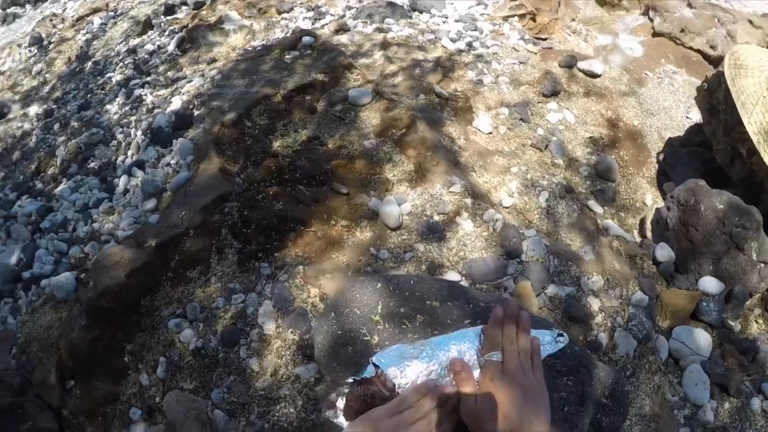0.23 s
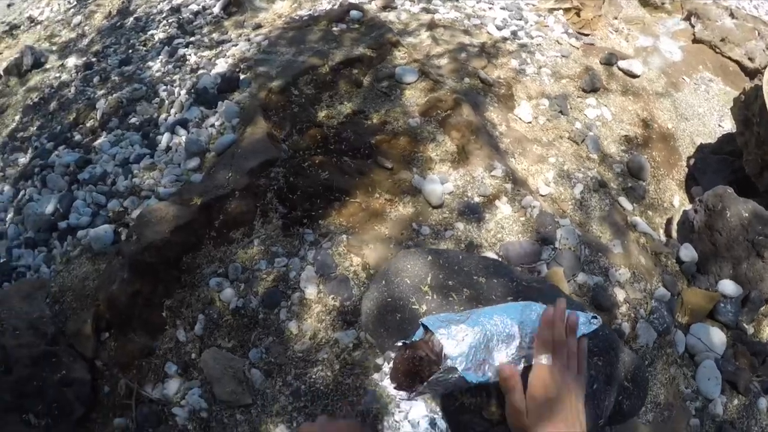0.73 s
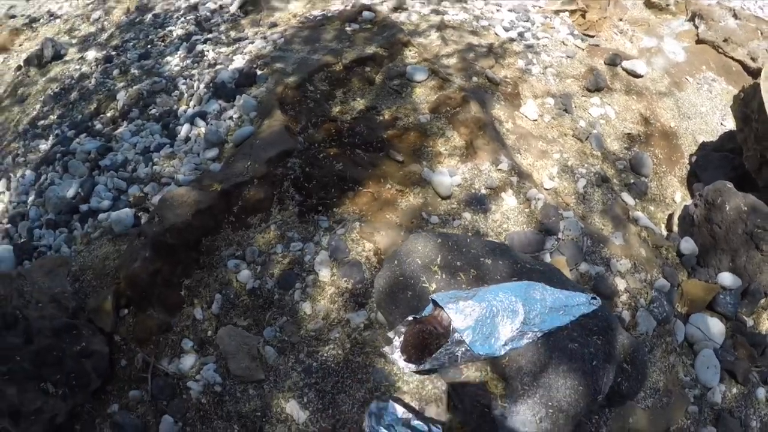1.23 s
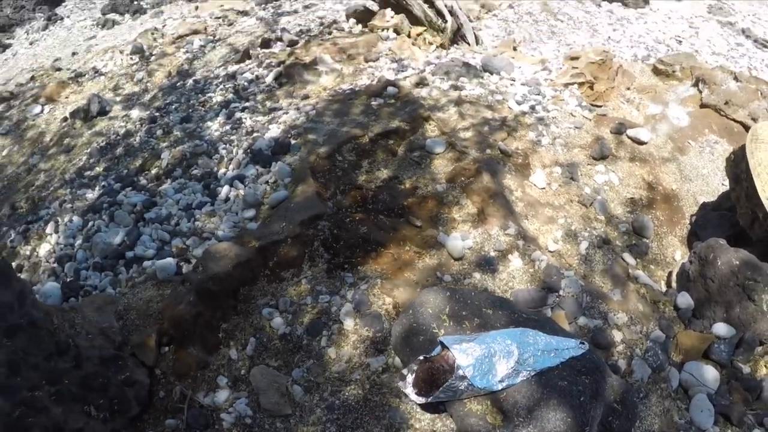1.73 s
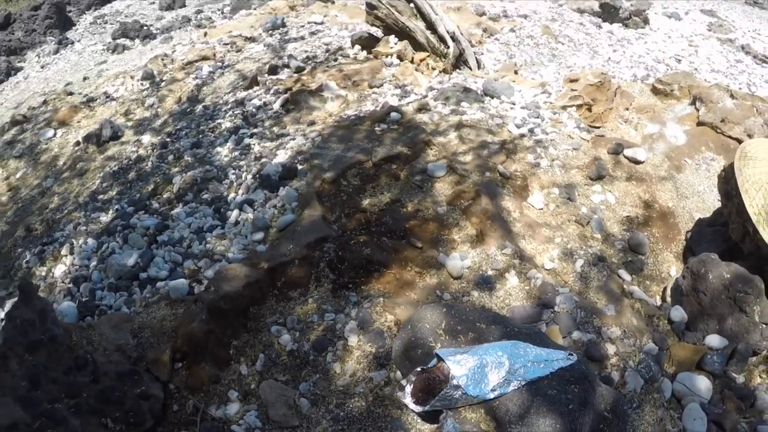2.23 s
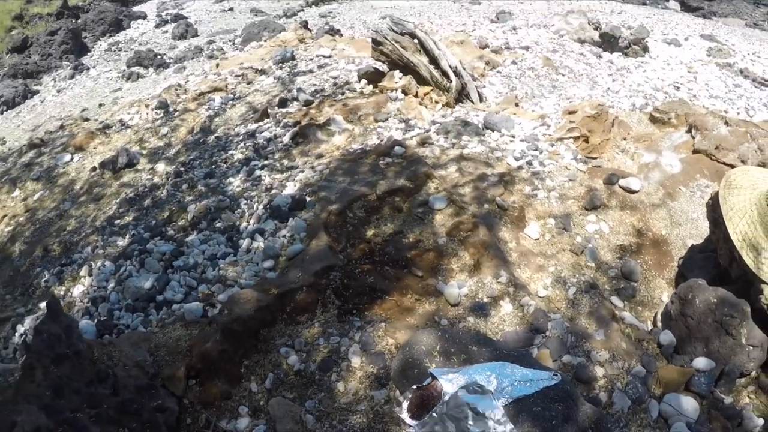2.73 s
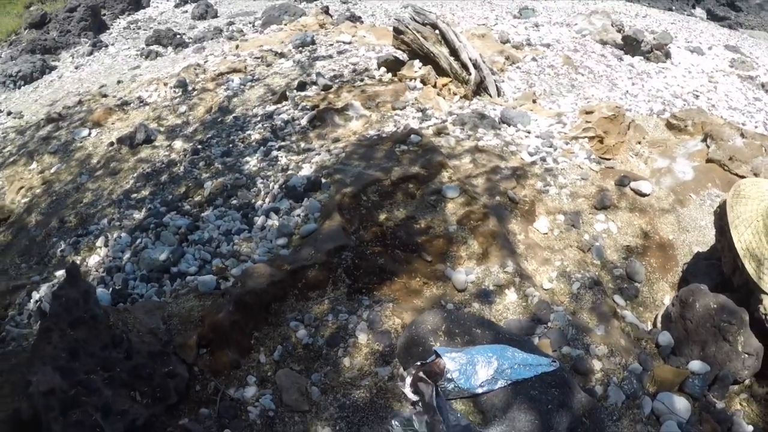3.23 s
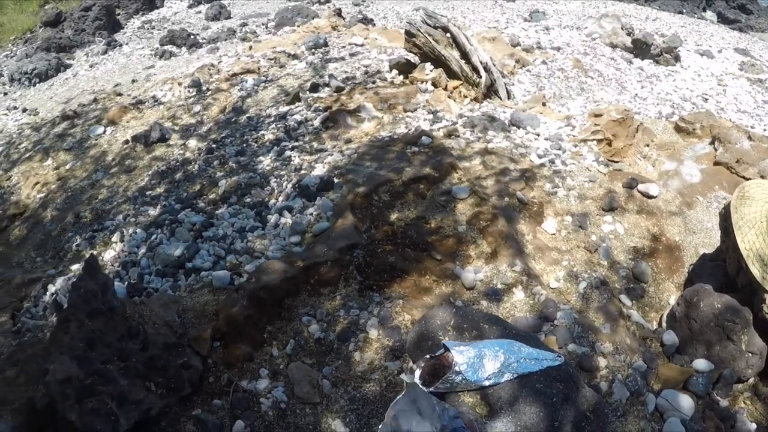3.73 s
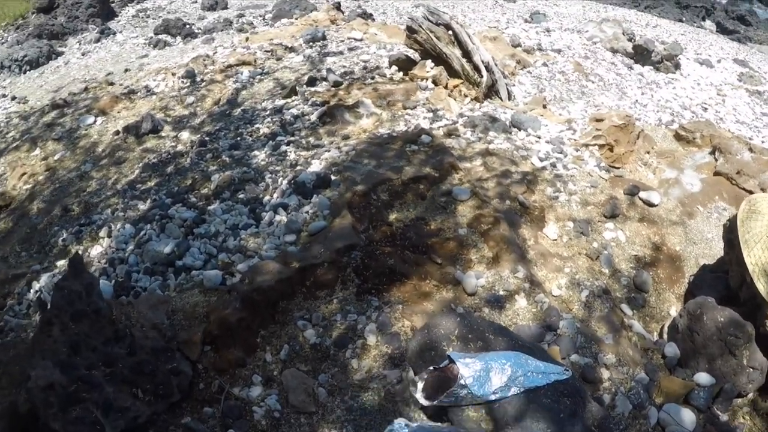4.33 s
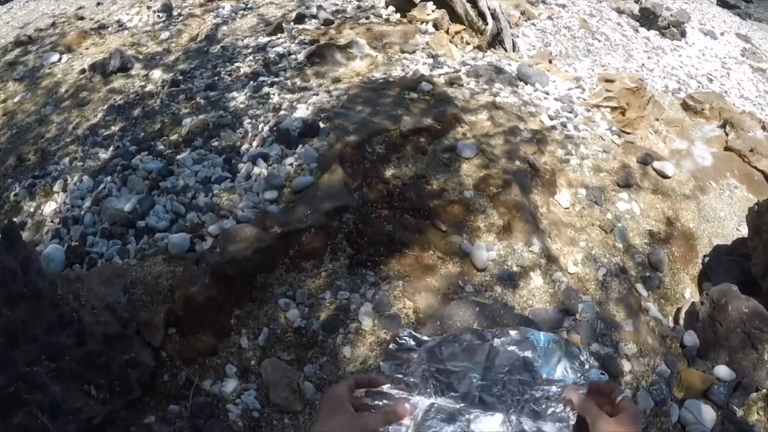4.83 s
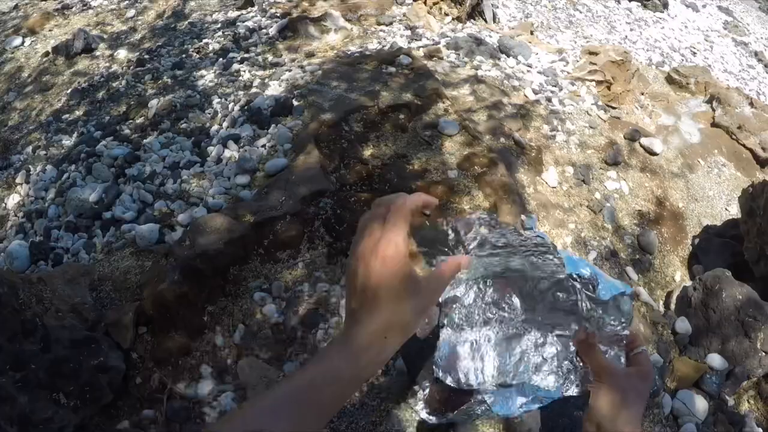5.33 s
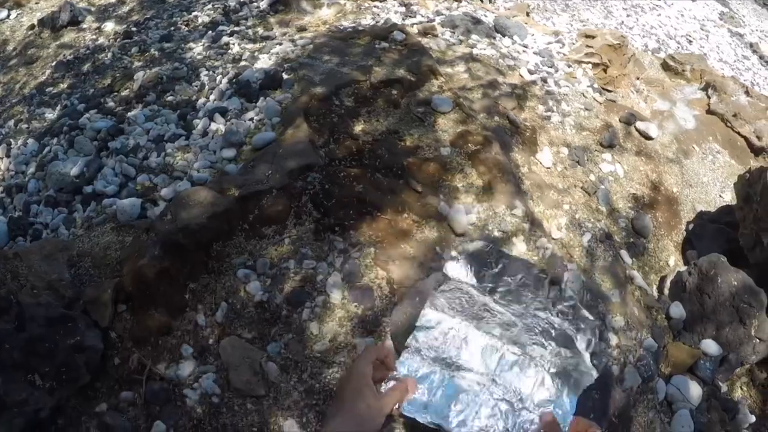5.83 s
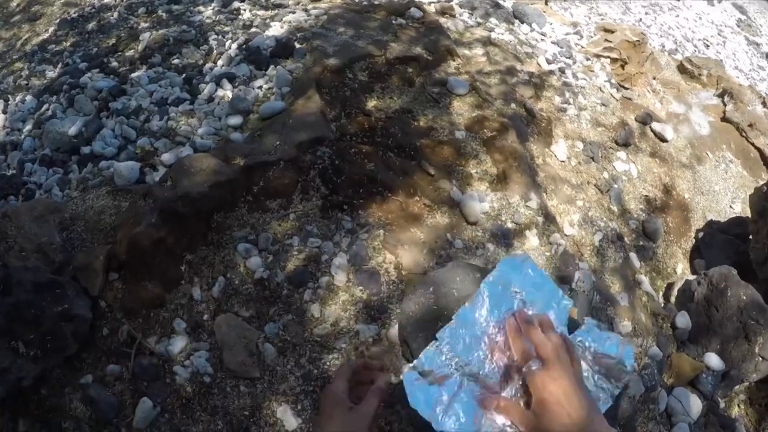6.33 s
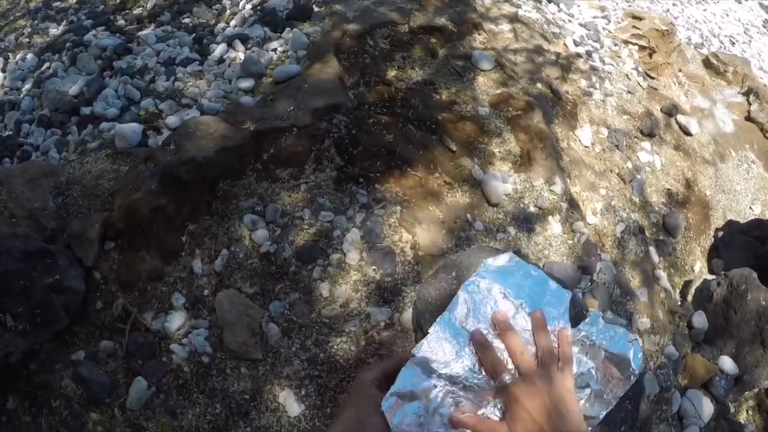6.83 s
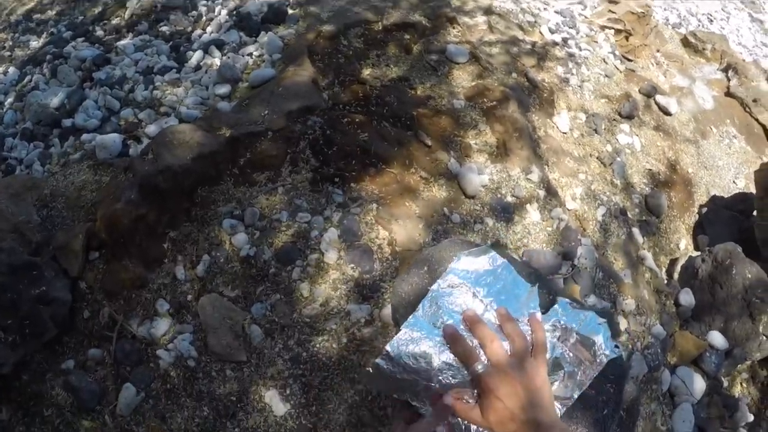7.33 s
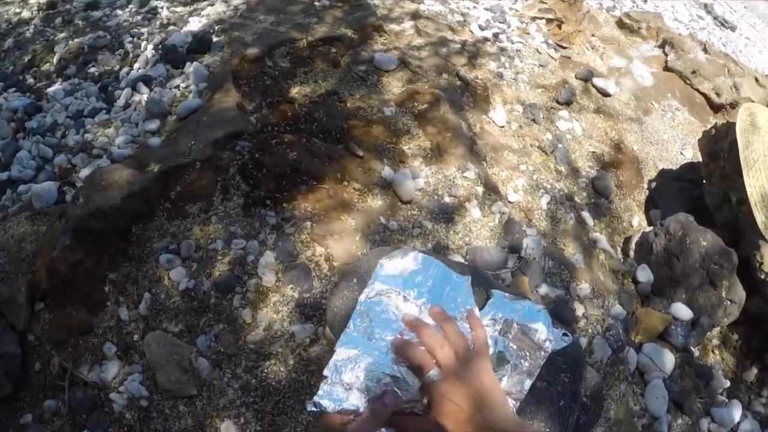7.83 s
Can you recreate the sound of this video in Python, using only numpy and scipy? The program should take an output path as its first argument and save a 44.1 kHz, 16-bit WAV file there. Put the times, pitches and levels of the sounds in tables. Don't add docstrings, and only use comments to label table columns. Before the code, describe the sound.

Metal foil crinkles, snaps and rustles close by as hands fold and press it outdoors, over steady distant surf hiss and light wind buffeting.

```python
import sys
import numpy as np
from scipy import signal
from scipy.fft import rfft, irfft, next_fast_len
from scipy.io import wavfile

SR = 44100
rng = np.random.default_rng(int(sys.argv[2]) if len(sys.argv) > 2 else 0)


def materialize(psi):
    bounded = np.clip(np.atleast_2d(psi).T, -1, 1)
    quanta = np.round(bounded * 32767).astype(np.int16)
    wavfile.write(sys.argv[1], SR, quanta)


def volts_from_db(level):
    exponent = np.asarray(level, float) / 20
    return 10 ** exponent


N = 356019

# (pitch [Hz], level per Hz [dB])
SURF_SPECTRUM = [(200, 15), (500, 9), (1500, 2.5), (3000, 3), (6000, -11.5), (12000, -3.5)]
# (pitch [Hz], level per Hz [dB])
BUFFET_SPECTRUM = [(90, 0.5), (120, 3), (165, 0), (220, -5.5), (300, -9), (450, -24), (900, -22)]
# (time of the height [s], buffeting level [dB], length [s], left over right [dB])
GUSTS = [(0.005, -44.5, 0.041, 6), (1.677, -53.5, 0.46, 22), (2.517, -69, 0.27, -2),
         (4.178, -45.5, 0.14, 9.5), (4.62, -45.5, 0.21, 6.5), (4.995, -54, 0.75, 0),
         (5.99, -48.5, 0.22, 12), (6.357, -46.5, 0.21, 4), (6.554, -55, 0.19, -9), (6.78, -45, 0.096, 2),
         (6.947, -41.5, 0.17, 5), (7.307, -43.5, 0.15, 8), (7.48, -44, 0.071, 21),
         (7.514, -41.5, 0.077, 17), (7.583, -36, 0.11, 16), (7.668, -36.5, 0.1, -6), (8.0, -49, 0.95, 2)]
# (time [s], level [dB], left over right [dB])
EDDIES = [(1.223, -40, 16), (1.265, -36, 13), (1.395, -51, 5), (1.51, -33.5, 19), (1.593, -35.5, 16),
          (1.675, -34, 16), (1.726, -35, 18), (1.752, -40, 16), (1.821, -42, 16), (1.922, -41, 13),
          (2.229, -38, 14), (2.545, -31.5, 4), (3.115, -40, 16), (4.161, -34, 19), (4.341, -39.5, 5),
          (4.59, -34, -3), (4.64, -34, -8), (5.018, -42, 8), (5.218, -34, 7), (5.279, -38, 14),
          (5.67, -32, -3), (5.778, -39.5, 9), (5.861, -39, 17), (5.899, -37.5, 17), (5.983, -33, 18),
          (6.068, -37, 22), (6.143, -42.5, 30), (6.196, -37, 9), (6.25, -42, 5), (6.363, -34, 22.5),
          (6.466, -38, 3), (6.541, -32, 1), (6.782, -36.5, 22), (6.874, -38, 16), (6.902, -32, 14),
          (6.988, -36, 18), (7.084, -39.5, 15), (7.152, -36.5, 12), (7.192, -38, 5), (7.226, -36, 25),
          (7.289, -27.5, 11), (7.365, -33, 3), (7.395, -37, 24), (7.545, -21, 21), (7.588, -20, 15),
          (7.786, -47, 4), (7.84, -30.5, 0), (7.929, -44, 8), (7.958, -37, 9), (7.989, -37, 12)]
# (pitch [Hz], response [dB], left over right [dB], right leads [rad], likeness [0-1])
PORTS = [(294, -7, 2.5, 2, 0.34), (610, -2, 6.5, 2, 0.8), (860, 1, 1, 2.5, 0.71),
         (1150, 1.5, -6.5, 2, 0.91), (1444, -0.5, -6, 2, 0), (1593, 0, -9.5, 2.2, 1),
         (1950, 0.5, 1.5, -1.7, 0.78), (2220, -5, -2, -0.7, 0.24), (2900, -4.5, -5.5, 1.14, 0.8),
         (4260, -4.5, 0.5, -1.8, 0.9), (5060, -4.5, .5, 1.13, 0.7), (6040, 4, 1.5, 1.1, 0.84),
         (6900, 3, .5, 1.1, .6), (7700, -0.5, -1, 1.1, 0.4), (8700, -5.5, -5, -1, .1),
         (10240, -12.5, -4, -2.9, .3), (11300, -20, -1.5, -3.1, 0.2), (12200, -15.5, 0, -3.1, .36),
         (14400, -17.5, 0, -3.1, .38), (15500, -32, 1, -3.1, 0.2)]
# (time [s], left peak level [dB], right peak level [dB])
KNOCK = (7.6682, -7, -13.5)
# (pitch [Hz], level [dB], t60 [s], right side louder by [dB])
HOUSING_MODES = [(198, 2, 0.021, 2), (494, 2.5, 0.0096, -5), (1000, 3, .006, -4), (1700, 4.5, 0.0052, -4),
                 (2140, 5, 0.0042, -3), (3140, -1, 0.007, 2), (3800, 1, 0.0064, -3.5),
                 (4450, -4, 0.0041, 8), (5300, -12.5, 0.0084, 13.5), (5900, -17, .006, 7),
                 (7000, -17, .005, 4), (8700, -9.5, 0.0064, 7)]
# (time [s], peak level [dB], panel pitch [Hz])
POPS = [(.1, -35, 1230), (0.388, -30, 930), (.626, -30, 837), (1.454, -27.5, 1700), (2.2, -30, 622),
        (2.201, -28, 2510), (2.283, -26.5, 740), (2.768, -27, 3300), (2.872, -36, 1900), (3.518, -33, 1180),
        (4.751, -26, 1240), (5.287, -26, 3700), (5.645, -32, 1910), (5.662, -22, 745), (5.817, -29, 4000),
        (5.942, -29, 2050), (5.945, -24, 1130), (5.954, -23, 1860), (6.854, -26, 900), (6.89, -17, 417),
        (7.1, -29.5, 477), (7.157, -23, 470), (7.187, -21, 1000), (7.281, -21, 745), (7.344, -21.5, 760),
        (7.568, -15.5, 374), (7.617, -24, 2700), (7.84, -30, 1860), (7.909, -29, 1120)]
# (time [s], peak level [dB], bright over dull [dB], thud level [dB])
TICKS = [(0.1036, -32, -8, -5), (0.4146, -34, -10, -8), (0.4264, -23, -2, -16), (0.431, -38, -4, -10),
         (0.6673, -33, 9, -18), (1.8404, -35, -6, -19), (1.8554, -33, 3, -15), (1.9322, -21, -1, -12),
         (2.3839, -21, 3, -9), (2.428, -27, -7, -14), (2.7608, -23, 3, -9), (2.8914, -32, -7, -10),
         (3.0398, -35, -3, -9), (3.5458, -34, -14, -8), (3.66, -22, 8, -3), (4.0179, -39, 13, -18),
         (4.0675, -38, -9, -16), (4.0725, -30, -16, -14), (4.1494, -24, 11, -14), (4.1678, -16, -6, -12),
         (4.2123, -32, 5, -11), (4.2795, -38, -10, -6), (4.3563, -35, -11, 6), (5.0255, -22, -1, -10),
         (5.1888, -23, 0, -4), (5.2159, -25, -6, -7), (5.2538, -28, -3, -6), (5.2884, -26, -15, -17),
         (5.3597, -32, -9, -11), (5.6066, -40, -23, -9), (5.665, -19, -8, -11), (5.6716, -24, -6, -10),
         (5.757, -29, -10, -14), (5.7913, -24, -4, -14), (5.8055, -29, -6, 1), (5.829, -28, -12, 19),
         (6.2466, -33, 1, -13), (6.3705, -23, -27, -17), (6.7891, -19, -10, -16), (6.8727, -30, -6, -2),
         (6.905, -18, -6, 3), (6.9322, -24, -18, -9), (6.9398, -31, -17, -9), (7.0585, -31, 10, -13),
         (7.1041, -30, -12, -11), (7.2587, -30, -1, -15), (7.4398, -33, 1, -15), (7.618, -18, -16, -14),
         (7.788, -9.5, 25, -4), (7.911, -19, -2, -6)]
# (time 1.1 ms ahead of the flip [s], peak level [dB], bright over dull [dB], thud level
# [dB])
LEADS = [(2.198, -20, 0, -22), (2.757, -24, -4, -10), (2.8729, -18, -13, 4), (3.517, -22, -4, -12),
         (4.0992, -23, -7, -12), (4.156, -25, -2, -12), (4.5408, -18, -10, -17), (5.056, -29, -15, -12),
         (5.1133, -21, 2, -14), (5.1973, -21, -2, -14), (5.3748, -21, 4, -18), (5.636, -22, -2, -12),
         (6.2307, -28, 6, -8), (6.688, -32, -4, -14), (6.7054, -29, -4, -12), (6.7715, -24, -4, -12),
         (6.8279, -29, -4, -12), (6.8554, -29, -4, -10), (6.9677, -28, -4, -12), (7.1282, -33, -7, -12),
         (7.1443, -22, -6, -12), (7.1587, -14.5, -9, -6), (7.904, -30, -4, -12)]
# (time [s], peak level [dB], fold depth [dB], dying time [s])
SNAPPING = [(0.1263, -25, -10, 0.054), (0.397, -23.5, -14, 0.022), (0.626, -16, -12, 0.046),
            (1.1036, -32, -34, 0.14), (1.338, -23.5, -13, 0.035), (1.3796, -24, -38, 0.033),
            (1.839, -23, -36, 0.031), (1.853, -26, -30, 0.036), (1.93, -30, -30, 0.039),
            (2, -25, -13, 0.056), (2.114, -25.5, -12, 0.059), (2.1991, -11.5, -9.5, 0.021),
            (2.3456, -30.5, -11, 0.12), (2.406, -30, -28, 0.028), (2.461, -24.5, -35, 0.04),
            (2.529, -21, -12.5, 0.055), (2.754, -23, -28, 0.085), (2.8404, -38, -0.5, 0.049),
            (2.874, -13, -4.5, 0.015), (3.1197, -21, -33, 0.024), (3.2594, -23, -29, 0.026),
            (3.47, -25, -29, .037), (3.5184, -20.5, -19, 0.037), (3.768, -25.5, -27, 0.018),
            (4.0164, -13.5, -33, 0.024), (4.0662, -26, -21, 0.033), (4.1, -21.5, -19, 0.029),
            (4.152, -25, -15, 0.11), (4.2108, -36.5, -6, 0.21), (4.5406, -23, -3.5, 0.036),
            (4.966, -26, -13, 0.036), (5.025, -16.5, -12, 0.013), (5.055, -20.5, -17, 0.054),
            (5.196, -23, -13, 0.066), (5.305, -24, -15, 0.048), (5.357, -32, -10, 0.031),
            (5.376, -13.5, -36, 0.015), (5.637, -22.5, -12, 0.034), (5.665, -15.5, -8.5, 0.04),
            (5.757, -30, -11, 0.046), (5.791, -23, -35, 0.025), (5.844, -30.5, -8.5, 0.12),
            (5.9484, -32, -13, 0.054), (6.231, -24, -12.5, 0.077), (6.3683, -31, -13.5, 0.15),
            (6.703, -29, -29, 0.07), (6.771, -27, -12, 0.075), (6.7872, -26, -16, 0.019),
            (6.854, -26.5, -6, 0.061), (6.905, -29, -14, .011), (6.967, -27, -15, 0.039),
            (7.058, -20, -30, 0.019), (7.101, -19.5, -7.5, 0.02), (7.1433, -21, -18, 0.058),
            (7.1592, -14, -18, 0.016), (7.1873, -20.5, -8, 0.032), (7.2575, -27, -30, 0.044),
            (7.284, -31, -2, 0.039), (7.44, -21, -14, 0.016), (7.543, -22, -12, 0.035)]
# (time [s], peak level [dB], fold depth [dB])
CRUSHING = [
    (7.5776, -19.5, -14),
    (7.615, -27.5, 3),
    (7.684, -19, -8),
    (7.768, -17, 0),
    (7.7874, -15, -14),
    (7.839, -22, -8),
    (7.883, -24.5, -13),
    (7.904, -20, -16),
    (7.93, -23, -7),
    (7.961, -27, -12),
]
# (time [s], peak level [dB], fold depth [dB])
FAINT = [(0.562, -28.5, -32), (0.7695, -33, -11), (1.1663, -33, -25), (1.3054, -29, -28),
         (2.1645, -34, -12), (2.4269, -33, -24), (2.95, -27, -11), (3.039, -32, -12), (3.223, -32.5, -10),
         (3.868, -30, -20), (4.353, -37.5, -3), (4.462, -27.5, -11), (4.683, -23.5, -20), (5.273, -25, -10),
         (5.8284, -45, -13), (5.932, -35, -2), (6.152, -30.5, -2), (6.651, -30, -4.5), (6.687, -25.5, -21),
         (6.8281, -30, -9), (7.3385, -41.5, 5), (7.445, -24, -25), (.6659, -31, -26), (8.041, -30, -4)]
# (time of most effort [s], bright rustle level [dB], length [s], sheet body level [dB])
MOVES = [(0.11, -44, 0.038, -50), (0.3, -49, 0.22, -47), (0.627, -65, .1, -58), (1.028, -46, 0.26, -38.5),
         (1.265, -43.5, 0.29, -60), (1.682, -48, 0.4, -41.5), (1.973, -39, 0.079, -62),
         (2.183, -45, 0.073, -57), (2.367, -54, 0.4, -45.5), (2.76, -43.5, 0.088, -37.5),
         (2.88, -44, 0.12, -58), (3.068, -49.5, 0.053, -41), (3.528, -45.5, 0.24, -40),
         (3.916, -62, 0.38, -40), (4.152, -41.5, 0.061, -36), (4.47, -49.5, 0.88, -39),
         (4.705, -45.5, 0.12, -37.5), (5.06, -50.5, 0.6, -47), (5.245, -47.5, 0.25, -41),
         (5.688, -50, 0.039, -38), (5.823, -48.5, 0.6, -41.5), (5.95, -40, 0.035, -40),
         (6.445, -42, 0.17, -39), (6.753, -40, 0.21, -55), (6.893, -38.5, 0.2, -34),
         (7.136, -41, 0.18, -54), (7.35, -46.5, 0.44, -35), (7.794, -43, 0.5, -57),
         (7.923, -49, 0.071, -31.5), (8.068, -43, 0.059, -52)]

CRUSH_DYING_S, FAINT_DYING_S = 0.03, 0.05
GRAIN_SPREAD_DB = 2.8
PATCH_HZ, PATCH_CYCLES, PATCH_DB = (1240, 3900, 5740, 9300), (4.4, 4.7, 6.9, 10.4), (-7, -2.5, -1, -5)
CONTACTS_S, CONTACTS_DB = (0, .0004, .0018), (-3.5, 2, -18)


def rms_one(x):
    return x / np.sqrt(np.mean(x ** 2) + 1e-20)


def in_pitch(rows, hz):
    f, *columns = np.transpose(rows)
    return [np.interp(np.log(hz + 1), np.log(f), column) for column in columns]


def filtered(sos, x):
    return signal.sosfilt(sos, x)


def drift(rate):
    r = np.exp(-40 * np.pi * rate / SR)
    slow = signal.lfilter([1], [1, -2 * r, r * r], rng.standard_normal(N // 20 + 4002))[4000:]
    return np.interp(np.arange(N) / 20, np.arange(len(slow)), rms_one(slow))


def swells(s, db, length, rise_share, rest_db):
    s, db, length = (np.reshape(column, (-1, 1)) for column in (s, db, length))
    t = np.arange(0, N + 64, 64) / SR - s
    share = np.clip(rise_share, .1, .9)
    away = np.where(t < 0, -t / share, t / (1 - share)) / np.clip(length, .02, 2)
    power = volts_from_db(2 * rest_db) + volts_from_db(2 * (db - 9 * away)).sum(axis=0)
    return np.interp(np.arange(N) / 64, np.arange(len(power)), np.sqrt(power))


def ring(clicks, hz, t60):
    r, w = volts_from_db(-60 / (t60 * SR)), 2 * np.pi * hz / SR
    return signal.lfilter([0, np.sin(w)], [1, -2 * r * np.cos(w), r * r], clicks + 1e-18)


def patchy_noise(spectrum, edges, patchy_db, rate):
    out, together, white = 0, drift(rate / 4), rng.standard_normal((2, N))
    for k, (low, high) in enumerate(zip(edges, edges[1:])):
        band = filtered(signal.butter(2, [low, high], "band", fs=SR, output="sos"), white[k % 2])
        level_db = in_pitch(spectrum, np.sqrt(low * high))[0]
        flicker_db = patchy_db * (0.24 * together + drift(rate))
        out = out + band * volts_from_db(level_db + flicker_db)
    return rms_one(out)


def surf():
    edges = 150 * 2 ** np.arange(0, 6.9, .68)
    return volts_from_db(-39.5) * patchy_noise(SURF_SPECTRUM, edges, patchy_db=2.0, rate=6.9)


def rumble():
    deep = signal.butter(3, [20, 56], "band", fs=SR, output="sos")
    shared, own = filtered(deep, rng.standard_normal((2, N)))
    turn = swells(8.0, -42, 0.28, rise_share=0.38, rest_db=-74)
    return turn * rms_one(shared + 0.27 * own * [[1], [-1]])


def breeze():
    s, db, length, pan_db = np.transpose(GUSTS)
    calm_db, calm_pan_db = -55.5, 2
    edges = 85 * 2 ** np.arange(0, 3.6, .4)
    sides = []
    for side in (1, -1):
        gain = swells(s, db + side * pan_db / 2, length, 0.55, calm_db + side * calm_pan_db / 2)
        sides.append(volts_from_db(8.5) * gain * patchy_noise(BUFFET_SPECTRUM, edges, patchy_db=3.5, rate=18.7))
    return np.array(sides)


def eddies():
    out, t = np.zeros((2, N + SR)), np.arange(-2000, 2000) / SR
    chance = rng.uniform(-1.35, 1, (len(EDDIES), 2, 3))
    for (s, db, pan_db), c in zip(EDDIES, chance):
        hz = 185 * (1 + 0.16 * c[:, :1])
        width_s = 0.0097 * (1 + 0.17 * c[:, 2:])
        swing = np.sin(2 * np.pi * hz * t + np.pi * c[:, 1:2]) * np.exp(-.5 * (t / width_s) ** 2)
        at = round((s - .006) * SR) - 2000
        out[:, at:at + 4000] += volts_from_db(db - 4 + np.array([[pan_db], [-pan_db]]) / 2) * swing
    return out[:, :N]


def knock():
    s, left_db, right_db = KNOCK
    out, start = np.zeros((2, N)), round(s * SR)
    at = np.round(np.array(CONTACTS_S) * SR).astype(int)
    for k, (hz, db, t60, more_right_db) in enumerate(HOUSING_MODES):
        for side, side_db in enumerate((left_db, right_db + more_right_db)):
            clicks = np.zeros(N - start)
            contact_db = side_db + db + np.array(CONTACTS_DB) + rng.normal(0, 1, 3)
            clicks[at] = volts_from_db(contact_db) * [1, -1, 1]
            out[side, start:] += (-1) ** k * ring(clicks, hz, t60)
    return filtered(signal.butter(2, 7000, fs=SR, output="sos"), out)


def pops():
    out, t = np.zeros(N + SR), np.arange(SR // 8) / SR
    spray = rng.standard_normal((len(POPS), len(t))) ** 3
    for (s, db, hz), contacts in zip(POPS, spray):
        dying = volts_from_db(-60 * t / 0.075)
        crunch = ring(contacts * dying, hz, 13.5 / hz)
        at = max(round((s - .001) * SR), 0)
        out[at:at + len(t)] += volts_from_db(db - 1.5) * crunch / np.abs(crunch).max()
    return out[:N]


def ticks():
    out, t = np.zeros(N + SR), np.arange(400) / SR
    listed_to_flip_s = 0.001112
    flips = TICKS + [(s + listed_to_flip_s, *rest) for s, *rest in LEADS]
    chance = rng.uniform(-1.6, 1, (len(flips), 9))
    for (s, db, tilt_db, thud_db), c in zip(flips, chance):
        hz = np.array(PATCH_HZ) * (1 + 0.12 * c[:4])
        gain = volts_from_db(db + np.array(PATCH_DB) + [thud_db, -tilt_db / 2, 0, tilt_db / 2])
        swing = np.sin(2 * np.pi * np.outer(hz, t) + c[4:8, None])
        click = gain @ (swing * volts_from_db(-60 * np.outer(hz / PATCH_CYCLES, t)))
        at = round((s - .0003) * SR)
        second = at + round((0.00061 + 0.00047 * c[8]) * SR)
        out[at:at + 400] += click
        out[second:second + 400] -= 0.36 * click
    return out[:N]


def creases():
    crushed = [(*row, CRUSH_DYING_S) for row in CRUSHING]
    faint = [(*row, FAINT_DYING_S) for row in FAINT]
    return np.transpose(SNAPPING + crushed + faint)


def cracks():
    s, db, _, t60 = creases()
    clicks = np.zeros(N)
    clicks[np.round(s * SR).astype(int)] = volts_from_db(db + 3.0 - 90 * t60) * rng.choice([-1, 1], len(s))
    return filtered(signal.butter(1, [2500, 11000], "band", fs=SR, output="sos"), clicks)


def bursts(extra_db):
    out, t = np.zeros(N + SR), np.arange(SR // 4) / SR
    rise = 1 - np.exp(-t / 0.0034)
    for (s, db, _, t60), more_db in zip(creases().T, extra_db):
        at = max(round((s - .0012) * SR), 0)
        out[at:at + len(t)] += volts_from_db(db + more_db - 60 * t / np.clip(t60, .008, .2)) * rise
    return out[:N]


def facets(strength, per_s, low_hz, high_hz, cycles, spread_db, count):
    sizes = volts_from_db(spread_db * np.minimum(rng.exponential(1, N), 4)) * rng.choice([-1, 1], N)
    clicks = sizes * (rng.random(N) < per_s / SR)
    clicks = strength * clicks / np.sqrt(np.mean(sizes ** 2) * per_s / SR)
    dealt = rng.integers(0, count, N)
    out = 0
    for k, hz in enumerate(np.geomspace(low_hz, high_hz, count)):
        out = out + ring(clicks * (dealt == k), hz, cycles / hz) * np.sqrt(hz / SR / cycles)
    return out


def snaps():
    _, db, depth_db, _ = creases()
    top = volts_from_db(13.5) * bursts(0 * db)
    middle = volts_from_db(20.0) * bursts(depth_db)
    body = volts_from_db(23.5) * bursts(-3.5 + 0.99 * depth_db)
    out = facets(top, 2500, 4020, 14500, 19.0, GRAIN_SPREAD_DB, count=9)
    out += facets(middle, 1800, 1990, 4480, 25.0, 3.4, count=8)
    return out + facets(body, 1200, 286, 1670, 3.0, 7.6, count=6)


def rustle():
    s, bright_db, length, sheet_db = np.transpose(MOVES)
    bright = swells(s, bright_db, length, rise_share=0.46, rest_db=-54)
    sheet = swells(s, sheet_db, length, rise_share=0.46, rest_db=-50)
    clumps = volts_from_db(2.56 * drift(14.3))
    out = facets(volts_from_db(18.5) * bright * clumps, 3600, 2800, 11900, 10, GRAIN_SPREAD_DB, count=11)
    out += facets(volts_from_db(11.5) * sheet * clumps, 500, 448, 2180, 5.1, GRAIN_SPREAD_DB, count=6)
    return out + facets(volts_from_db(8) * bright, 210, 1830, 9000, 25.0, 1.5, count=8)


def foil():
    return snaps() + rustle()


def ports(shared, other):
    size = next_fast_len(N + 4096)
    gain_db, pan_db, lead, alike = in_pitch(PORTS, np.arange(size // 2 + 1) * SR / size)
    cepstrum = irfft(gain_db * np.log(10) / 20, size)
    cepstrum[1:size // 2] *= 2
    cepstrum[size // 2 + 1:] = 0
    colour = np.exp(rfft(cepstrum))
    a, b, alike = rfft(shared, size), rfft(other, size), np.clip(alike, 0, 1)
    mixed = alike * a + np.sqrt(1 - alike ** 2) * b
    left = colour * volts_from_db(pan_db / 2) * a
    right = colour * volts_from_db(-pan_db / 2) * np.exp(1j * lead) * mixed
    return irfft(np.array([left, right]), size)[:, :N]


def scene():
    panel = pops() + cracks() + ticks()
    direct = surf() + foil() + panel
    other_path = surf() + foil() + panel
    heard = ports(direct, other_path) + breeze() + eddies() + knock()
    wind_filter = signal.cheby1(5, 1.5, 148.4, "high", fs=SR, output="sos")
    return filtered(wind_filter, heard) + rumble()


def top_cut(x):
    return signal.sosfilt(signal.butter(12, 16500, fs=SR, output="sos"), x)


def record(dry):
    over_db = np.maximum(20 * np.log10(np.abs(dry).max(axis=0) + 1e-9) + 4.2, 0)
    ramp = 60 * np.arange(N) / SR
    held_db = np.maximum(np.maximum.accumulate(over_db + ramp) - ramp, 0)
    duck_db = signal.lfilter([.001], [1, -.999], held_db)
    ducked = dry * volts_from_db(-.6 * duck_db)
    rounded = .95 * np.tanh(ducked / .95)
    mix = filtered(signal.cheby2(12, 70, 16500, fs=SR, output="sos"), rounded)
    return top_cut(mix)


dry = scene()
out = record(dry)
materialize(out)
```